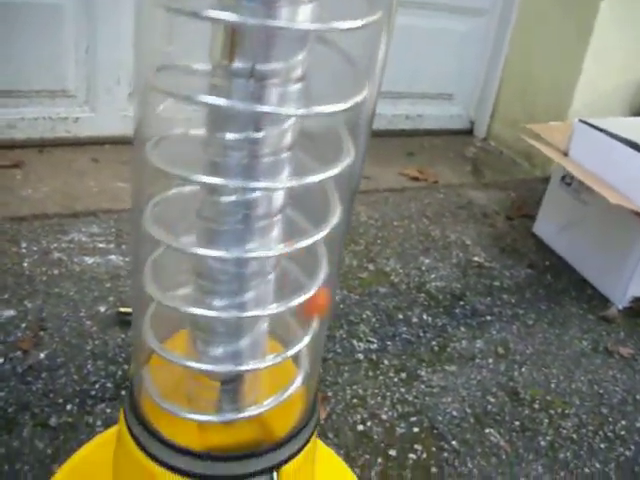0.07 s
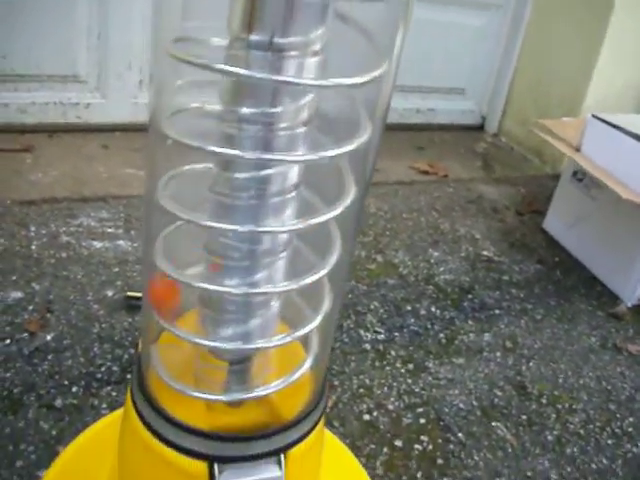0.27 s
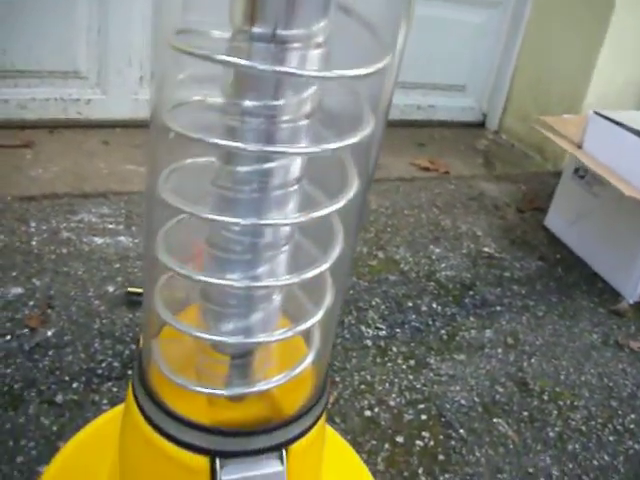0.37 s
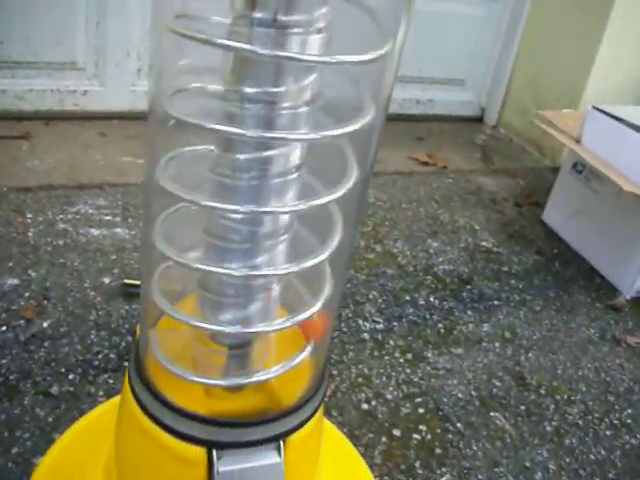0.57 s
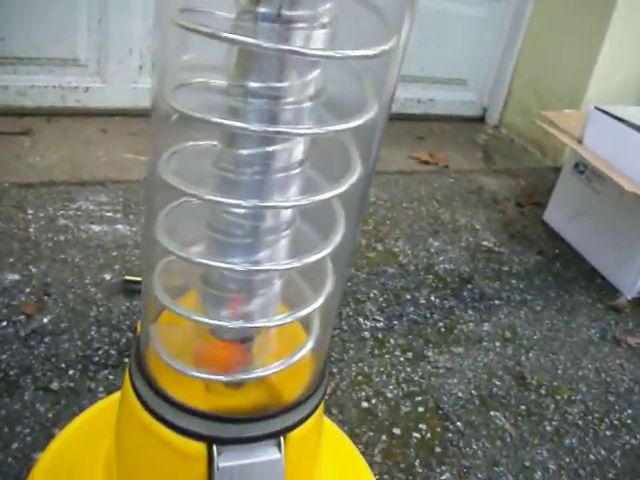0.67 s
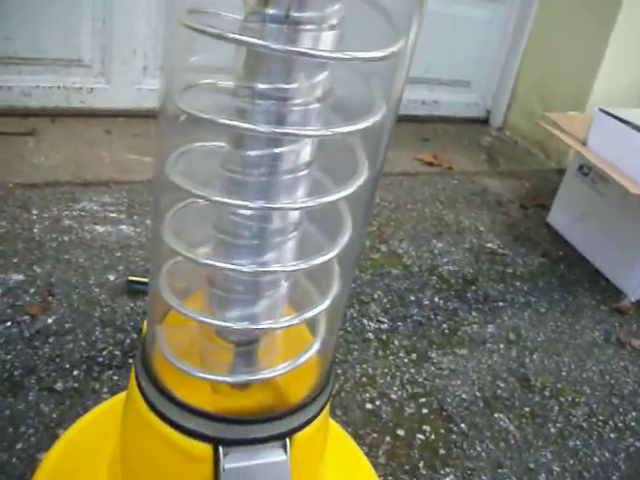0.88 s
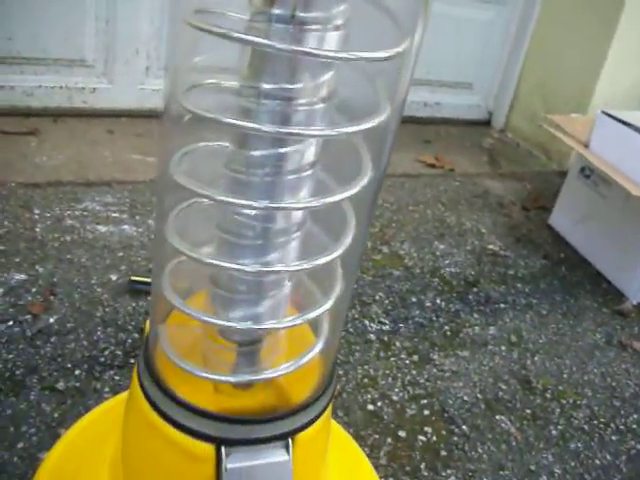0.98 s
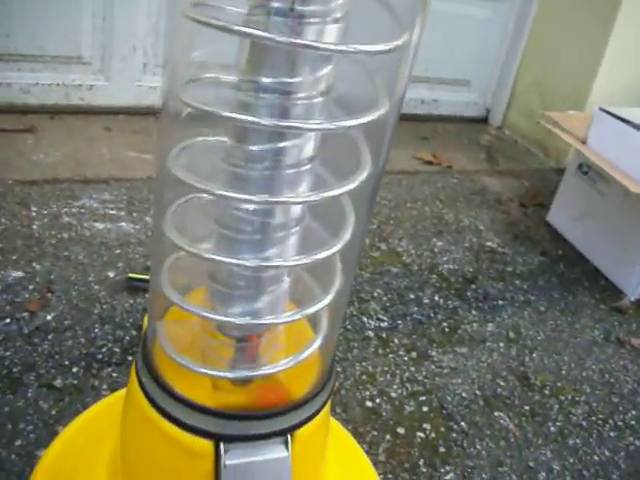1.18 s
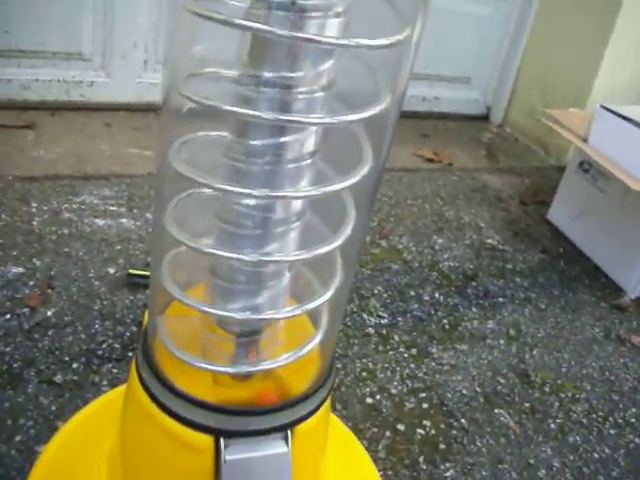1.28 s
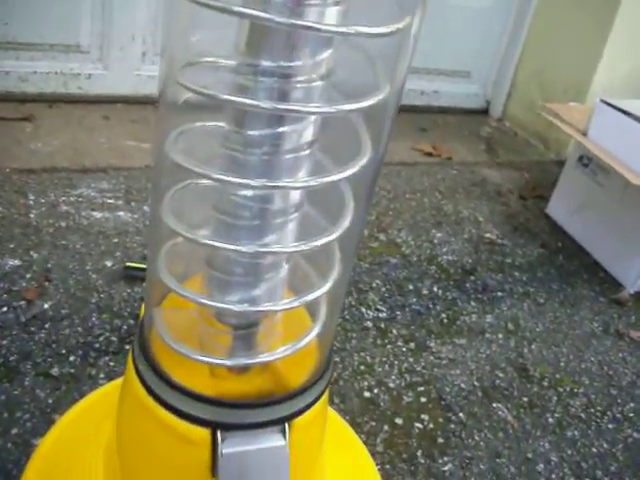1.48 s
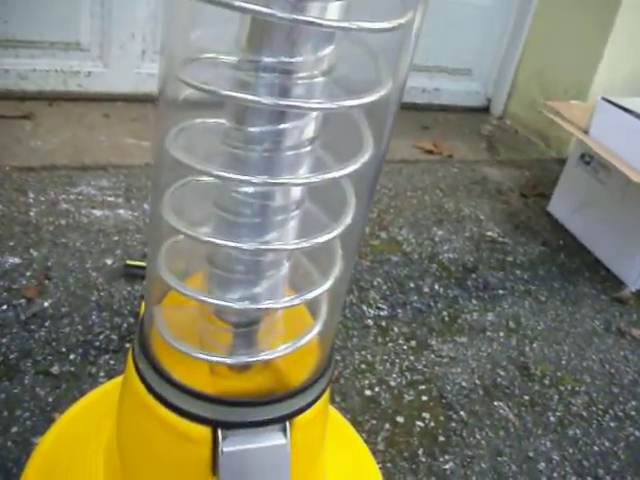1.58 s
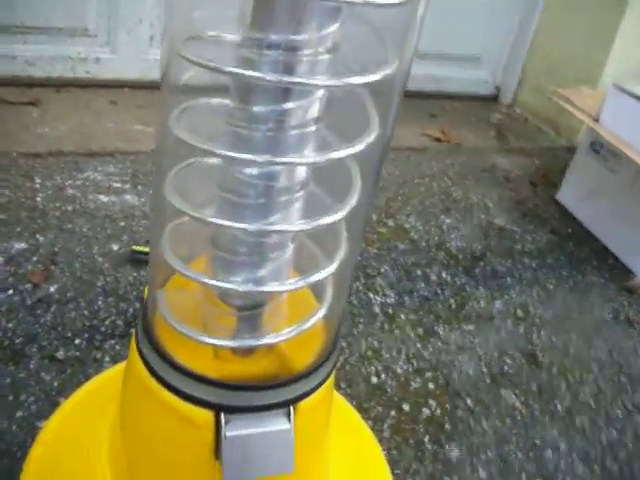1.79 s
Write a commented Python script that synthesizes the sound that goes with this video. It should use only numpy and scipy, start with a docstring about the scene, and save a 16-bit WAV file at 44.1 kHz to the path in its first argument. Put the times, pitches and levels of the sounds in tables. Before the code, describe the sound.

A hard ball rolls down a wire spiral, ticking finely over a low rumble. From about 0.8 seconds it rattles louder against the ringing tube. Between 1.2 and 1.4 seconds it bounces four times in a hollow plastic base, the hardest knocks slightly overloading the close, dull microphone. A short scuff follows near 1.5 seconds, with light taps until 1.8. Faint outdoor air lies underneath.

```python
"""Fine ticking over a low rumble: a hard ball rolls down a wire spiral inside a clear tube.
It rattles against wire and wall through the last turn, drops into the hollow plastic base and
bounces there four times, then scuffs and taps to rest. A small, dull microphone close by
overloads on the hardest knocks; faint outdoor air lies under it all."""
import sys
import numpy as np
from scipy import signal
from scipy.fft import rfft, irfft, next_fast_len
from scipy.io import wavfile

SR = 44100
rng = np.random.default_rng(int(sys.argv[2]) if len(sys.argv) > 2 else 0)


def unload_wav(signal):
    """Save mono or channel-first audio to the path in sys.argv[1] as 16-bit WAV at rate SR, clipped to [-1, 1]."""
    wavfile.write(
        sys.argv[1],
        SR,
        np.round(np.clip(np.atleast_2d(signal).T, -1, 1) * 32767).astype(np.int16),
    )


N = 81585
AGE = np.arange(8192) / SR  # seconds since a hit

# tone of the struck wire: f/Hz, level/dB
WIRE_TONE = [(40, -45.5), (100, -24), (170, -7), (260, -16.5), (450, -2), (1000, 2), (1700, -3),
             (2100, -6.5), (2600, -1.5), (3400, -15.5), (4200, -12), (5500, -26)]
# resonances of the tube: f/Hz, level/dB, t60/s
TUBE_MODES = [(413.4, -2.5, 0.091), (710, -20, .06), (897, -4, 0.082), (985, 8.5, 0.067), (1130, -9, .09),
              (1288, -3.5, 0.061), (1470, -3, .09), (1905, -6, 0.081), (1905.6, -11.5, .1),
              (2235, -11.5, 0.065), (2590, -7, 0.058), (2630, -9.5, 0.063), (3260, -27.5, .07),
              (4250, -16.5, .08)]
# hollow tone of the base: f/Hz, level/dB
HOLLOW_TONE = [(80, -6.5), (200, 1), (400, 3), (700, 5), (950, 4), (1400, 4.5), (2200, -3), (3000, -6.5),
               (3700, -3.5), (4600, -6.5), (5500, -17.5)]


def undb(db):
    """Decibels to gain."""
    return 10 ** (np.asarray(db) / 20)


def at_level(x, db):
    """Scale a short sound to the energy of 10 ms at this level."""
    return x * undb(db) / np.sqrt(np.sum(x ** 2) / (SR / 100))


def add(out, at_s, x):
    """Mix a short sound in at a time."""
    i = int(np.clip(at_s * SR, 0, N - 1))
    out[i:i + len(x)] += x[:N - i]


def colour(x, tone, tilt_db=0):
    """Causal EQ through (f/Hz, level/dB) points, tilted per octave and rolled off above 6 kHz."""
    n = 2 * next_fast_len(len(x))
    hz, db = np.array(tone, float).T
    bin_hz = np.arange(n // 2 + 1) * SR / n
    octave = np.log2(np.clip(bin_hz, 10, 7000) / 1500)
    gain_db = np.interp(octave, np.log2(hz / 1500), db) + tilt_db * octave
    gain_db -= 40 * np.clip(bin_hz / 6000 - 1, 0, 1)
    cepstrum = irfft(np.log(undb(gain_db)))
    cepstrum[1:n // 2] *= 2  # minimum phase: nothing sounds ahead of the attack
    cepstrum[n // 2 + 1:] = 0
    return irfft(rfft(x, n) * np.exp(rfft(cepstrum)))[:len(x)]


def contact(tone, tilt_db, chatter_ms, chatter_db):
    """A sharp click followed by a few milliseconds of chatter that stops abruptly."""
    click = at_level(1. * (AGE == 0), 0)
    chatter = rng.choice([-1, 1], len(AGE)) * np.exp(-(AGE * 1000 / chatter_ms) ** 2)
    chatter = at_level(chatter, chatter_db) * np.sqrt(chatter_ms)
    return colour(click + chatter, tone, tilt_db)


def tail(tone, tilt_db, rise_s, fall_s, shape=1, damping=.2):
    """Crowded shell resonances swell and die away, the treble sooner; fall_s holds at 1 kHz."""
    noise = rfft(rng.standard_normal(len(AGE)))
    hz = np.arange(len(noise)) * SR / len(AGE)
    centres_hz = 250 * 2 ** np.arange(5)
    x = 0
    for centre, share in zip(centres_hz, np.eye(len(centres_hz))):
        band = irfft(noise * np.interp(hz, centres_hz, share))
        life_s = fall_s * (1000 / centre) ** damping
        x = x + band * np.exp(-(AGE / life_s) ** shape)
    return colour(x * (1 - np.exp(-AGE / rise_s)), tone, tilt_db)


def ring(modes, tilt_db):
    """Damped modes; the contact point decides which way each one starts."""
    x = 0
    for (hz, db, t60), sign in zip(modes, rng.choice([-1, 1], len(modes))):
        envelope = undb(db + tilt_db * np.log2(hz) - 60 * AGE / t60)
        x = x + sign * envelope * np.sin(2 * np.pi * hz * AGE)
    return x


def ping(hz, peak_s):
    """A single tone that swells to a peak and fades."""
    return np.sin(2 * np.pi * hz * AGE) * AGE * np.exp(-AGE / peak_s)


def rolling():
    """Tiny bumps of the ball's surface drum on the spiral, and it skips in a stream of fine ticks."""
    # tone of the rumble: f/Hz, level/dB
    rumble_tone = [(40, -32), (110, 1.5), (175, 1), (240, -7), (450, 3), (950, 2.5), (1200, 7), (1400, -5),
                   (1700, 0.5), (2000, -18.5), (2600, -9), (3400, -24), (5500, -30)]
    # fader curve of the roll: t/s, level/dB
    fader = [(0, -36), (.17, -39.5), (.28, -38.5), (.37, -38.5), (.54, -40), (.64, -36), (.8, -40.5),
             (1.0, -47), (1.15, -35), (1.24, -42), (1.4, -53.5), (1.72, -52.5), (1.85, -46.5)]
    bumps_per_s, skip_gap_s, skips_db = 900, .01, -7.5
    strength = undb(2.5 * np.clip(rng.standard_normal(N), -2, 2))
    bumps = (rng.random(N) < bumps_per_s / SR) * strength * rng.choice([-1, 1], N)
    rumble = colour(bumps, rumble_tone)
    skips = np.zeros(N)
    for k, (late, size) in enumerate(rng.uniform(-1, 1, (200, 2))):
        chatter = rng.standard_normal(512) * np.exp(-AGE[:512] / .0012)
        add(skips, (k + late / 2) * skip_gap_s, at_level(chatter, 4 * size))
    skips = colour(skips, WIRE_TONE)
    roll = rumble / np.std(rumble) + undb(skips_db) * skips / np.std(skips)
    return roll * undb(np.interp(np.arange(N) / SR, *np.array(fader).T))


def air():
    """A steady bed of outdoor air and microphone hiss."""
    # tone of the bed: f/Hz, level/dB
    air_tone = [(20, 10.5), (45, 3.5), (65, 5.5), (130, -4), (220, -6), (330, 8), (550, -12.5),
                (1300, -5.5), (1950, -11.5), (2600, -14), (3300, -13), (4000, -0.5), (4700, -12.5),
                (5500, -25.5)]
    low_cut = signal.butter(2, 18, "high", fs=SR, output="sos")
    bed = colour(signal.sosfilt(low_cut, rng.standard_normal(N)), air_tone)
    return bed / np.std(bed) * undb(-43.5)


def wire_ticks():
    """The ball ticks along the wire, and the tube rings faintly with each tick."""
    # ball on wire: t/s, level/dB, brightness/(dB per octave), chatter/ms
    ticks = [(0.0144, -37, -2, 0.67), (0.0321, -37, -1, 5.3), (0.0834, -31.5, 0, 5.6),
             (.121, -42.5, -4.5, 2.6), (0.1339, -39, 2, 3.1), (.1515, -30, -2, 2), (0.158, -33.5, -4, 0.82),
             (0.1726, -43, 4, 1.6), (0.1825, -32, -3.5, 2.5), (.19, -44, -6, 2), (.2052, -31, 2.5, 3.3),
             (0.2232, -26.5, 0, 3.9), (.246, -37.5, 2.5, 1.4), (0.343, -35, -0.5, 1.9),
             (.357, -37.5, -5.5, 0.91), (0.3724, -28.5, -2.5, 1.3), (0.3955, -37, -2.5, 1.1),
             (0.4418, -29.5, -0.5, 3.3), (0.463, -36.5, -2, 0.86), (.509, -38, 3, 1.1),
             (0.5775, -36, -3.5, 1), (0.5896, -30, 2, 1.4), (0.608, -31, 2, 0.83), (.655, -32, 1.5, 0.55),
             (0.68, -31, 0.5, 0.38), (0.691, -39.5, 2.5, 0.88), (0.7052, -53, 9, 1), (.732, -41, 3.5, 2),
             (0.756, -36.5, 2, 0.78), (.784, -37.5, -1.5, 0.81), (.81, -31, 0, 1.1),
             (1.1239, -32, -1.5, 4.5), (1.136, -31.5, 0, 3.6), (1.1417, -34.5, 0.5, 1.7),
             (1.1665, -32.5, -2, 1.6), (1.182, -34.5, -0.5, 0.8), (1.2004, -37.5, -2.5, 2.7)]
    out = np.zeros(N)
    for at, db, tilt, chatter_ms in ticks:
        click = at_level(contact(WIRE_TONE, tilt, chatter_ms, chatter_db=3), db)
        body = at_level(tail(WIRE_TONE, tilt, rise_s=.0032, fall_s=.0079, damping=.52), db - 3.5)
        add(out, at, click + body + at_level(ring(TUBE_MODES, tilt), db - 10.5))
    return out


def tube_rattle():
    """In the last turn the ball rattles between wire and tube, setting the wall ringing."""
    # ball on tube: t/s, level/dB, brightness/(dB per octave), chatter/ms, relative ring/dB
    hits = [(.8326, -13, 1.46, 3.3, -8), (.893, -27.5, 0, 4.7, 2.5), (0.9107, -22, 2, 3.1, 2.5),
            (0.9147, -20, -2, 2.2, -6.5), (0.9528, -20, 0.5, 7.2, -1), (0.9813, -25, 0, 3.7, 1.5),
            (1.006, -23.5, -5.5, 4.3, -16.5), (1.012, -21, -4, 2.1, -8), (1.035, -32.5, 4, 8.5, 1),
            (1.0415, -26, -6, 5.1, -8), (1.06, -32.5, 3.5, 7.2, 2.5), (1.063, -28.5, -6, 3.3, -5.5),
            (1.0892, -24, 1, 7.2, -9)]
    # tone of the struck tube: f/Hz, level/dB
    tube_tone = [(40, -33), (100, -43.5), (300, -21), (600, -5.5), (980, 0.5), (1250, -3.5), (2000, -3),
                 (2520, -0.5), (2880, -16.5), (3260, -10.5), (3800, -22), (4550, -15), (5500, -28.5)]
    out = np.zeros(N)
    for at, db, tilt, chatter_ms, ring_db in hits:
        click = at_level(contact(tube_tone, tilt, chatter_ms, chatter_db=5), db)
        body = at_level(tail(tube_tone, tilt, rise_s=.001, fall_s=.019, damping=.15), db - 6.5)
        add(out, at, click + body + at_level(ring(TUBE_MODES, tilt), db + ring_db))
    return out


def base_knocks():
    """The ball bounces in the plastic base: a crack, a hollow ring and a thud of the whole shell."""
    # bounces: t/s, level/dB, brightness/(dB per octave), chatter/ms,
    # relative hollow/dB, relative ring/dB, hollow decay/s, relative crack/dB
    bounces = [(1.2139, -14.5, 2, 0.95, -1, -2.5, 0.017, -8),
               (1.2518, -19.5, 0, 1.34, -2, -17.5, 0.019, -30), (1.2771, -14.5, 2.3, 3, -2, -9, 0.022, -11),
               (1.3812, -13.5, 3.5, 3.2, -2.5, -1, 0.024, -8)]
    # tone of the struck plastic: f/Hz, level/dB
    plastic_tone = [(80, -16.5), (250, -4.5), (600, -7.5), (1200, 1.5), (1900, 4), (2500, 1), (3100, -0.5),
                    (3900, 2.5), (4600, 1.5), (5500, -8.5)]
    # resonances of the base: f/Hz, level/dB, t60/s
    base_modes = [(235, -23, 0.16), (671, 0, 0.16), (711, 0, 0.16), (830, -2, .1), (919, 5, 0.13),
                  (990, -23.5, 0.053), (1223, 2, 0.14), (1722, -16, .09), (1970, -22, 0.13),
                  (2170, -29, .08), (3544, 7, 0.058), (3820, 4, 0.06), (3560, -23, 0.061),
                  (3800, -12.5, .07)]
    # low end of the whole base: f/Hz, level/dB
    thud_tone = [(20, 5), (35, 10), (90, -16), (160, -9.5), (300, -8), (800, -49), (3000, -72)]
    rise_s = .0039
    out = np.zeros(N)
    for at, db, tilt, chatter_ms, hollow_db, ring_db, hollow_s, crack_db in bounces:
        crack = at_level(ping(hz=3970, peak_s=.0006), db + crack_db)
        hollow = tail(HOLLOW_TONE, tilt, rise_s, hollow_s, shape=1.17, damping=.18)
        hollow = at_level(hollow, db + hollow_db)
        click = at_level(contact(plastic_tone, tilt, chatter_ms, chatter_db=4.5), db)
        ringing = at_level(ring(base_modes, 0), db + ring_db)
        thud = at_level(tail(thud_tone, 0, rise_s, fall_s=.075), db - 24.5)
        add(out, at, crack + click + hollow + ringing + thud)
    return out


def snaps():
    """A thin, very short burst of treble tops two of the hardest knocks."""
    # bright snaps: t/s, level/dB
    peaks = [(1.2152, -37.5), (1.3817, -40)]
    treble = signal.butter(2, [6200, 11000], "band", fs=SR, output="sos")
    out = np.zeros(N)
    for at, db in peaks:
        burst = rng.choice([-1, 1], len(AGE)) * np.exp(-AGE / .00034)
        add(out, at, at_level(signal.sosfilt(treble, burst) + .26 * burst, db))
    return out


def settling_taps():
    """The ball taps to rest, each touch waking the hollow of the base."""
    # light touches: t/s, level/dB, brightness/(dB per octave), chatter/ms
    taps = [(1.457, -39, 1.5, 1.5), (1.5007, -32.5, 1, 1), (1.6698, -36, -0.5, 1.5), (1.756, -41, 0, 2),
            (1.79, -31.5, 0, 5.6)]
    # tone of a light touch: f/Hz, level/dB
    tap_tone = [(100, -12.5), (300, -26), (800, -8), (1300, 0), (1800, -8), (2500, 3.5), (3200, -6),
                (4200, 0), (5500, -13.5)]
    out = np.zeros(N)
    for at, db, tilt, chatter_ms in taps:
        click = at_level(contact(tap_tone, tilt, chatter_ms, chatter_db=-6.5), db)
        hollow = at_level(tail(HOLLOW_TONE, tilt, rise_s=.002, fall_s=.02), db - .5)
        add(out, at, click + hollow)
    return out


def scuff():
    """The ball scuffs once along the base: a short rasp with a squeak in it."""
    # tone of the rasp: f/Hz, level/dB
    rasp_tone = [(200, -17.5), (900, -17.5), (1300, -6.5), (1780, -7.5), (2100, -6), (2500, -6.5),
                 (3500, -8), (4800, -7), (5600, -11)]
    rasp = tail(rasp_tone, 0, rise_s=.0028, fall_s=.021, shape=.98, damping=.02)
    squeak = ping(hz=1765, peak_s=.0082)
    out = np.zeros(N)
    add(out, at_s=1.5465, x=at_level(rasp, -20.5) + at_level(squeak, -28))
    return out


def dull_microphone(x):
    """The small microphone rounds off strong peaks and lets little treble through."""
    ceiling, top_hz = .68, 5647
    rounded = x / (1 + (x / ceiling) ** 6) ** (1 / 6)
    return signal.sosfilt(signal.cheby1(12, .3, top_hz, fs=SR, output="sos"), rounded)


def scene():
    """Ball and air in mono; all is dull but the snaps."""
    ball = rolling() + wire_ticks() + tube_rattle() + base_knocks() + settling_taps() + scuff()
    return (dull_microphone(ball + air()) + snaps())[None]


def record(dry):
    """A steep high cut takes off the very top."""
    top_hz = 16400
    return signal.sosfilt(signal.ellip(8, .2, 70, top_hz, fs=SR, output="sos"), dry)


dry = scene()
out = record(dry)
unload_wav(out)
```